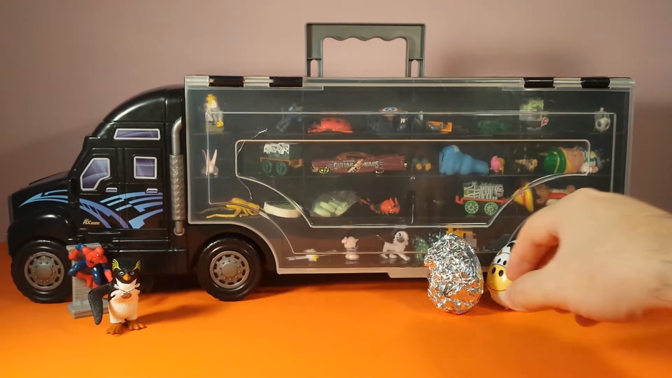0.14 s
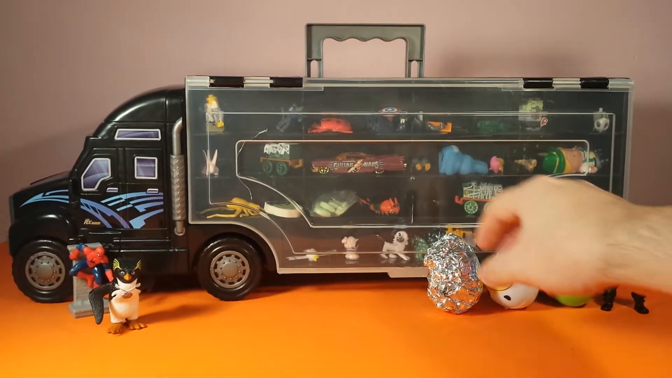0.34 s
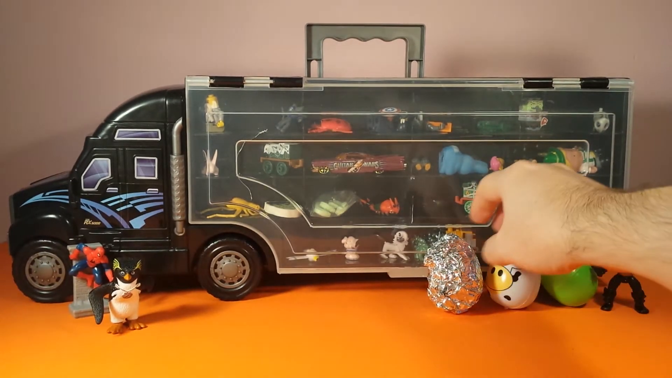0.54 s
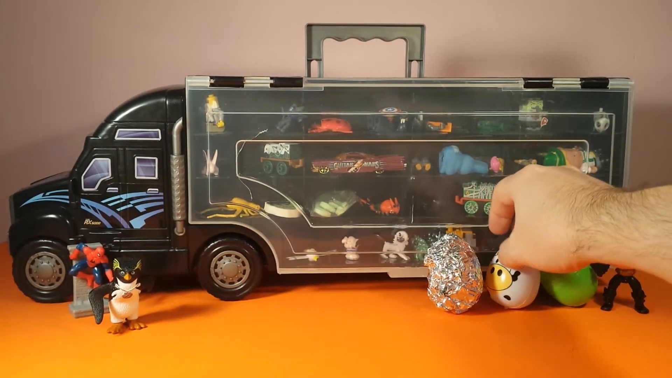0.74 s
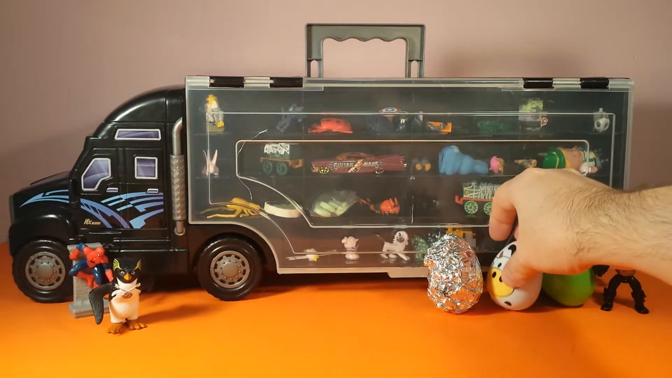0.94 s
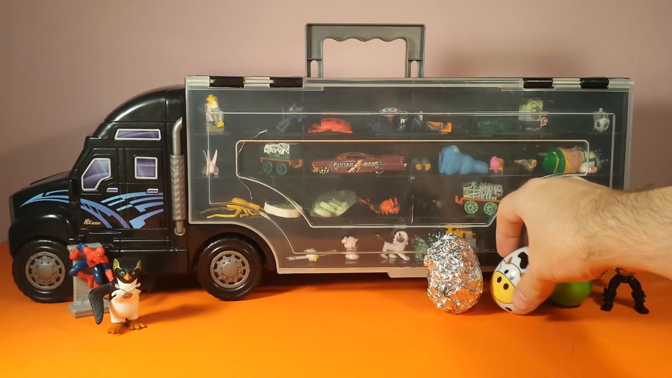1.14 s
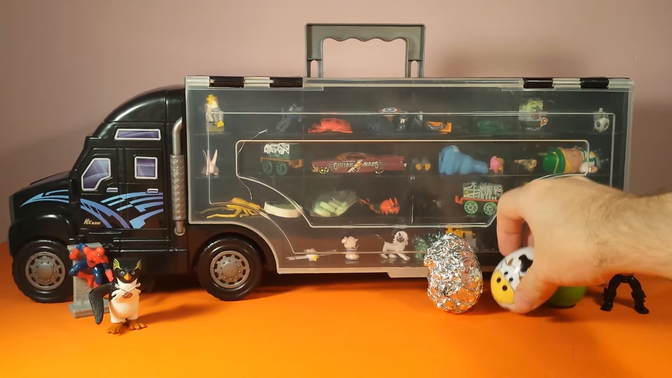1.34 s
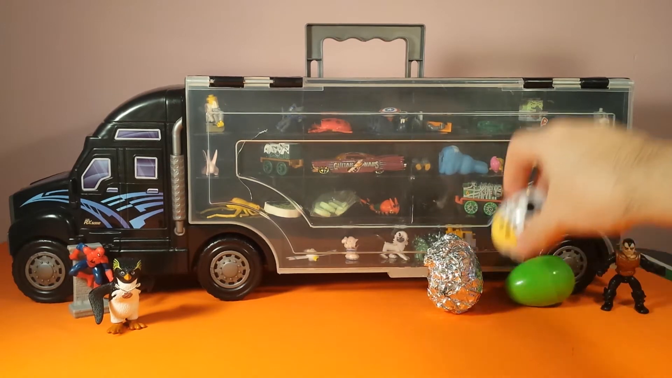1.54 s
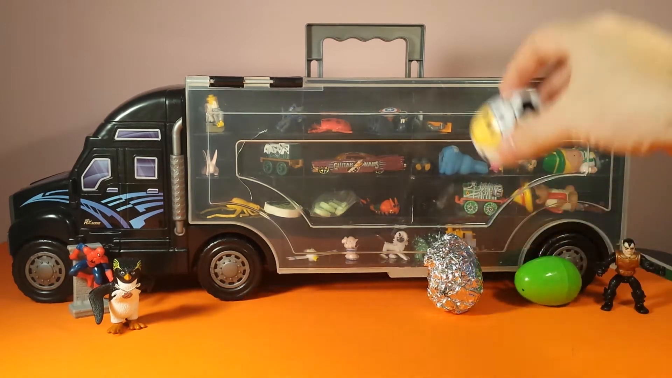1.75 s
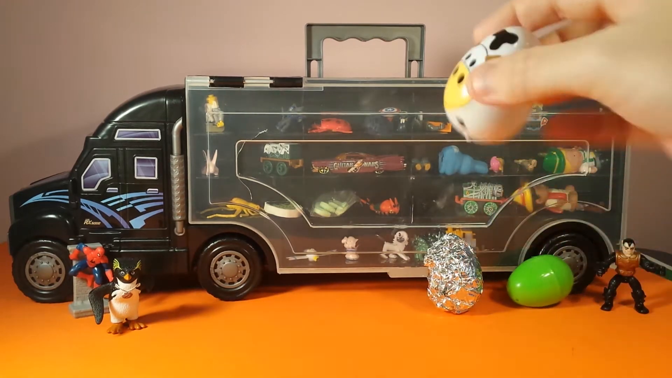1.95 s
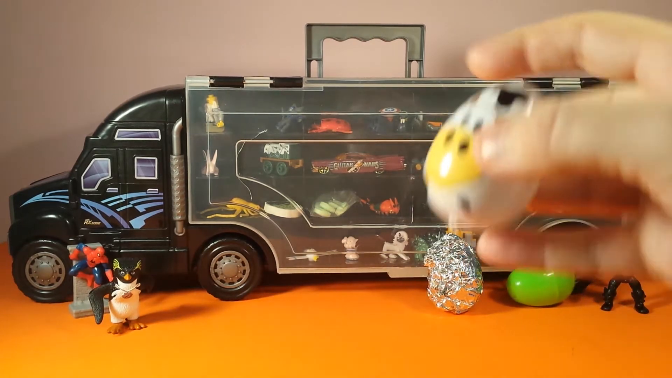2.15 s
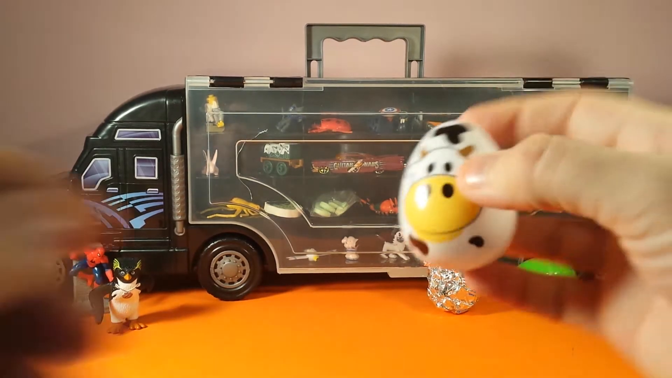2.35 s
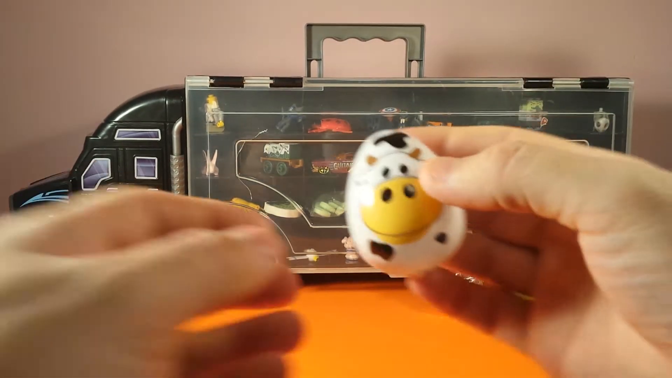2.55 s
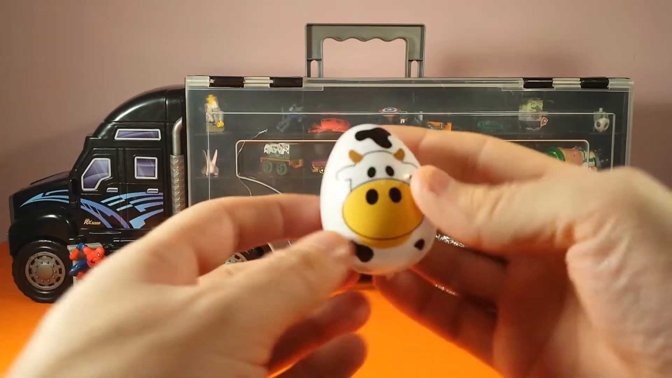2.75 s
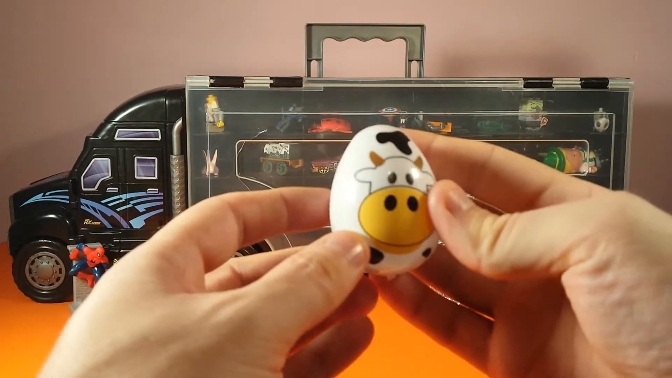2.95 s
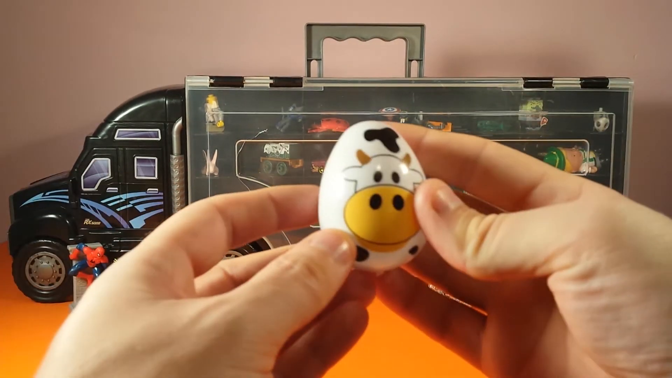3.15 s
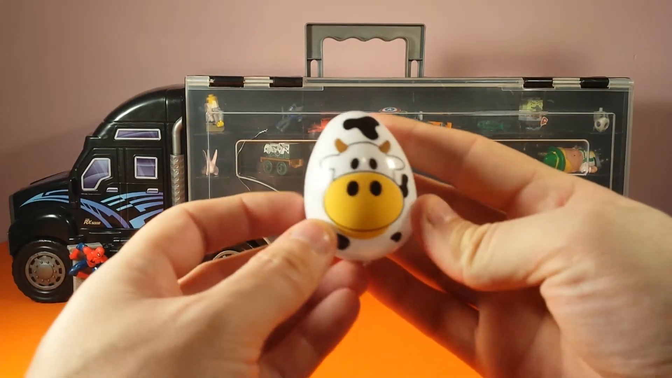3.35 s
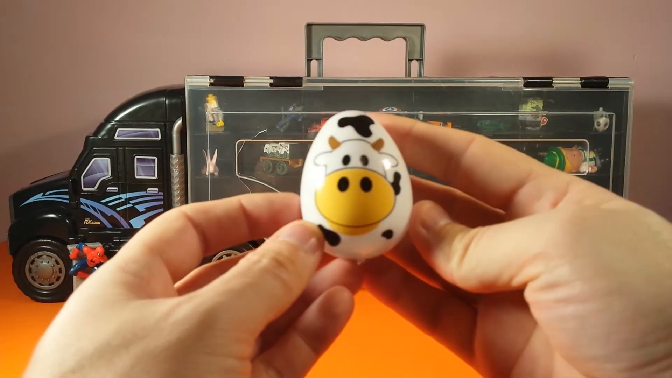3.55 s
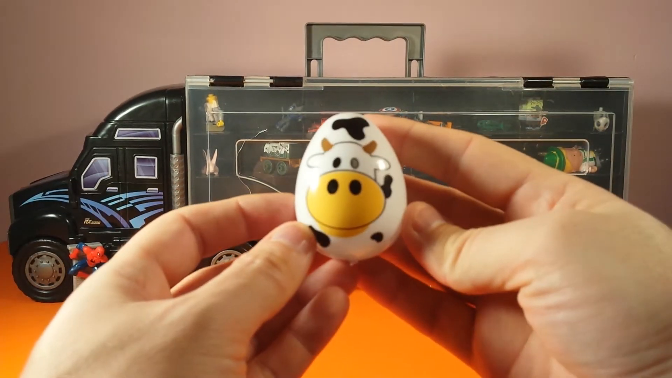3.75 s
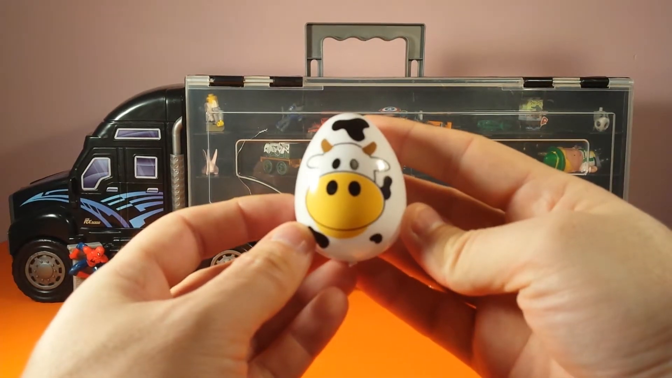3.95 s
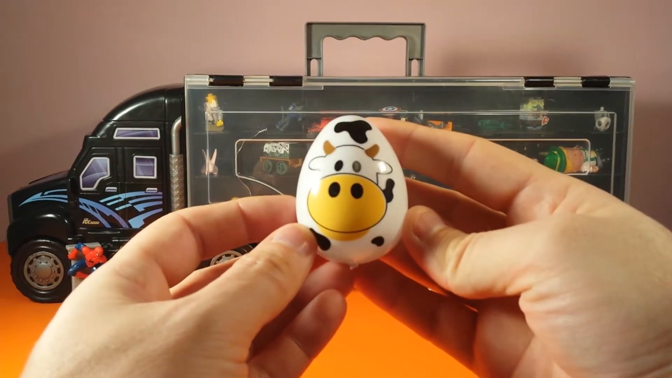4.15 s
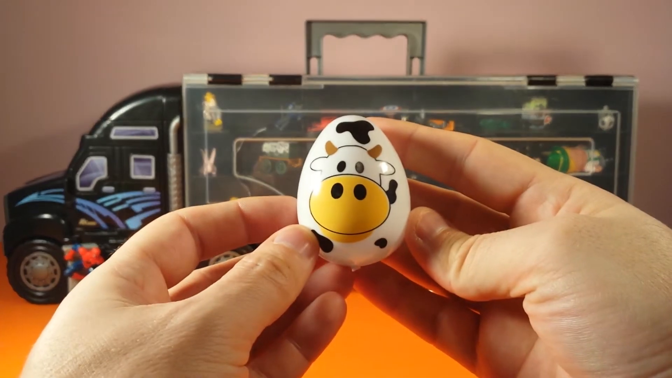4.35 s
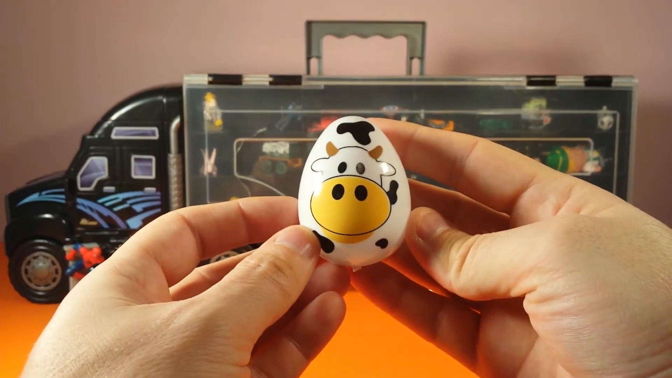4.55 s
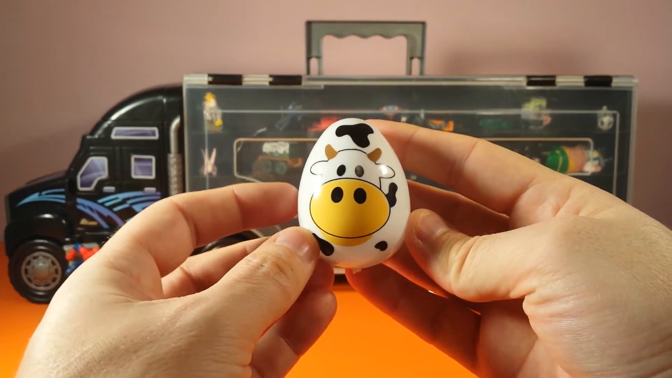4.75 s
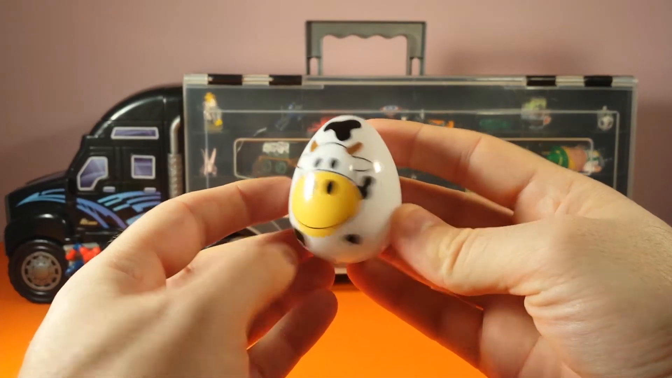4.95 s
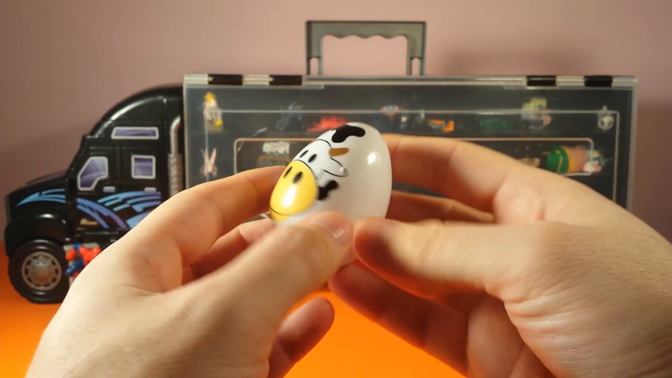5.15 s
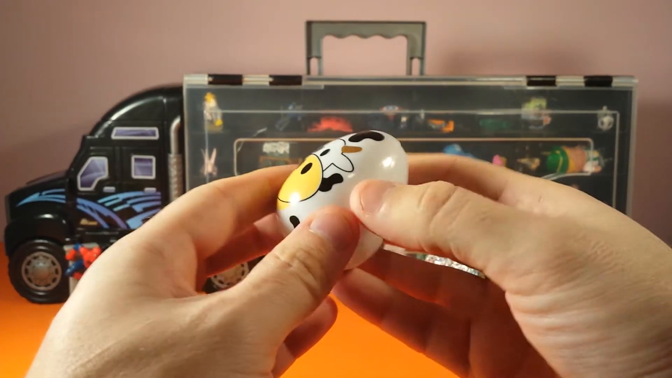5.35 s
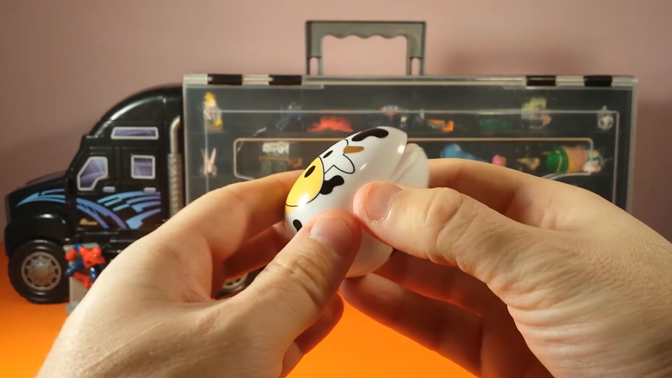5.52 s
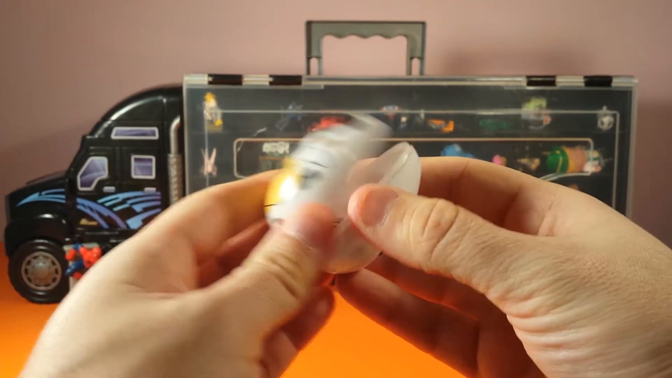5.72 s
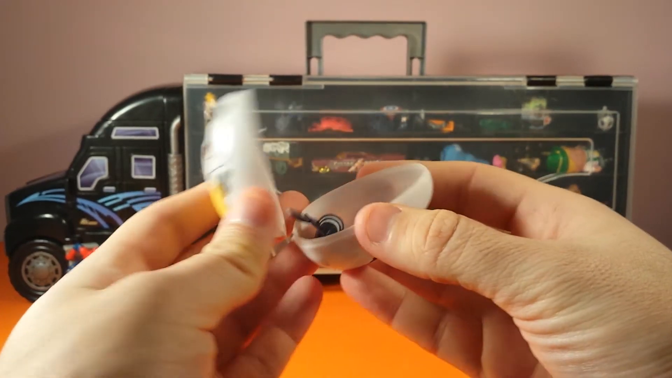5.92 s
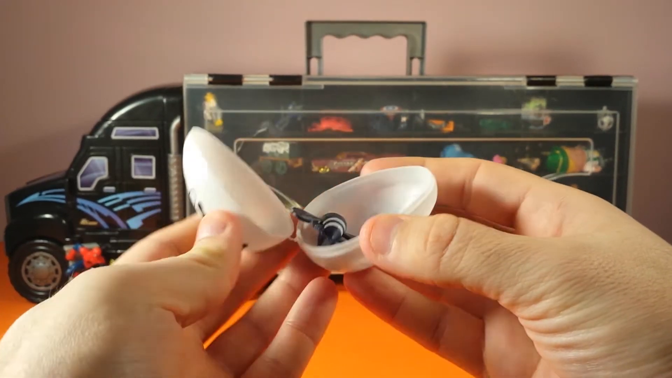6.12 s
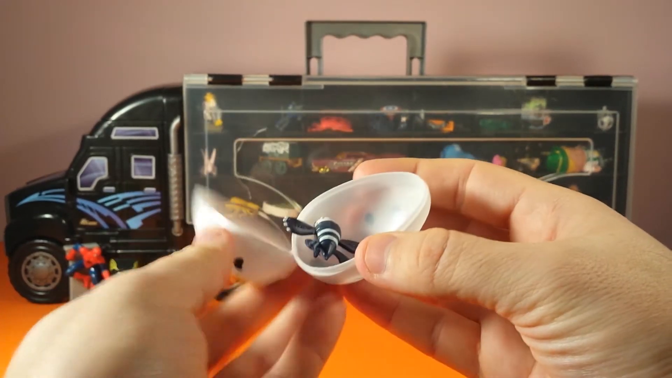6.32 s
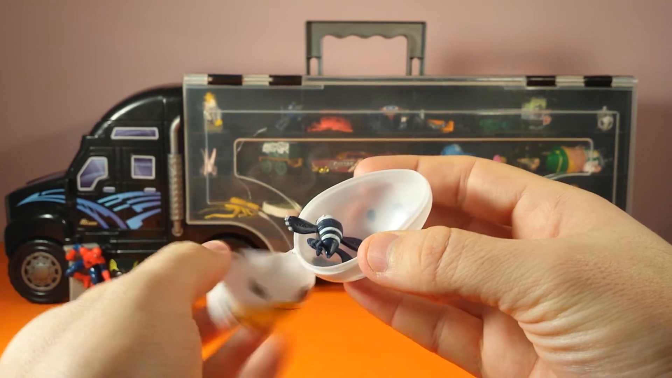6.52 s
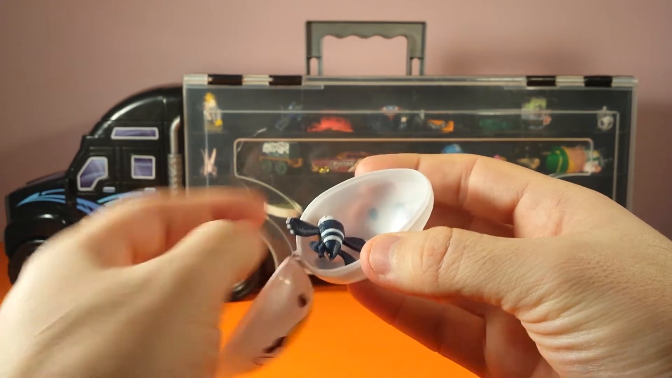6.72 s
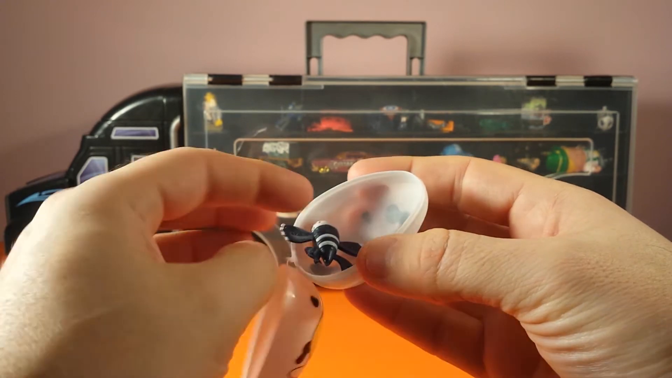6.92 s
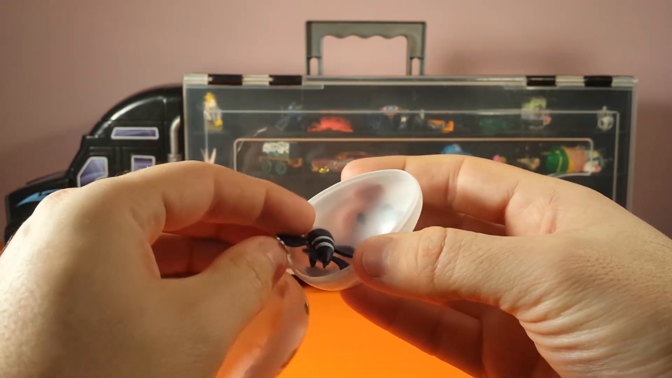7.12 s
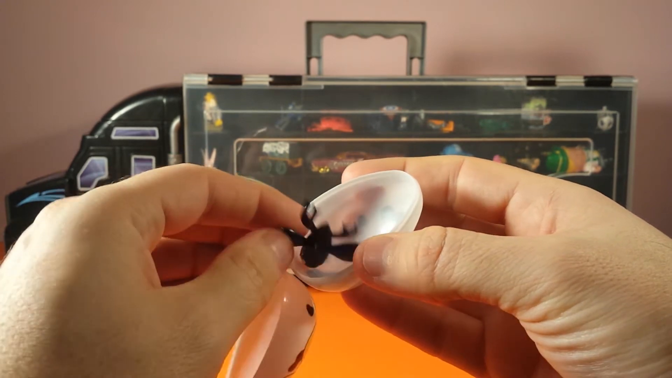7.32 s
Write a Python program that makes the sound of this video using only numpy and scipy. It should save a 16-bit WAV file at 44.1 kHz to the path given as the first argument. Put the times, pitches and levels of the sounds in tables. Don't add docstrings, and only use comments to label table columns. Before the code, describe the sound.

Crinkly foil brush, hollow plastic knocks, quiet handling, a loud double pop of a toy egg opening, then a little toy dropping in the shell.

```python
import sys
import numpy as np
from scipy import signal
from scipy.fft import rfft, irfft, next_fast_len
from scipy.io import wavfile

SR = 44100
rng = np.random.default_rng(int(sys.argv[2]) if len(sys.argv) > 2 else 0)


def voltage_ratio(decibels):
    exponent = np.asarray(decibels, float) / 20
    return 10 ** exponent


def wav_record(signal):
    frames = np.transpose(np.atleast_2d(signal))
    bounded = np.clip(frames, -1, 1)
    quanta = np.round(bounded * 32767).astype(np.int16)
    wavfile.write(sys.argv[1], SR, quanta)


N = 329868

# [t/s, peak level/dB, shell f/Hz, contact click/dB]
KNOCKS = [(.153, -37, 733, -1), (.195, -38.5, 718, -6), (.252, -42.5, 517, -11), (6.717, -68.5, 700, 5),
          (.728, -49.5, 600, -4.5), (.781, -46.5, 555, 1), (.8, -52.5, 237, -11), (.931, -57, 557, -21),
          (1.009, -65, 520, -18), (1.07, -46, 475, -14), (1.377, -37, 590, -19.5),
          (1.4005, -42.5, 547, -20.5), (1.427, -44, 560, -22), (1.447, -48, 596, -23),
          (1.47, -44.5, 625, -16), (1.492, -51, 570, -11), (1.533, -38, 580, -16), (1.556, -50, 580, -17),
          (1.796, -61, 334, -13), (3.171, -53, 248, -5.5), (1.541, -43, 600, -16), (1.567, -52, 620, -5),
          (1.514, -62, 524, -18), (5.743, -45.5, 337, -11), (5.755, -47, 314, -10), (5.842, -68, 312, -16),
          (6.6, -61.5, 930, -17), (7.27, -62, 860, 10.5), (7.3298, -63, 196, 11.5)]
# [t/s, peak level/dB, f/Hz, t60/s]
THUDS = [
    (0.253, -64, 123, 0.066),
    (0.451, -62, 116, 0.2),
    (1.428, -48.5, 74, 0.1),
    (1.523, -49, 62.5, 0.097),
    (1.598, -48, 52.3, 0.096),
    (1.627, -51, 89.5, 0.1),
    (1.667, -53, 69.6, 0.056),
    (5.779, -48.5, 51, 0.14),
    (5.765, -60, 305, .1),
    (5.792, -51, 304.6, 0.17),
]
# [f/Hz, level/dB]
CLACK = [(150, -43), (400, 3), (1000, -2), (1800, -3), (2800, -7.5), (3600, -17), (16000, -37)]
# [t/s, peak level/dB, ring f/Hz, left-right/dB, ring level/dB]
TICKS = [(.1416, -38, 7660, 0, -8), (.1456, -25, 6480, 2, -12), (0.155, -22, 6060, 1.5, -12),
         (.1564, -33, 7000, 1, -10), (.1644, -25, 6160, 5, -6), (.1925, -36, 6370, 2, -10),
         (0.234, -30, 6800, 4, -6), (0.2366, -23, 6400, -3, -8), (0.2455, -23, 6300, 6, -11),
         (0.242, -18, 6000, 5, -8), (0.2532, -17, 6100, -5, -3), (0.256, -24, 5500, 5, 4),
         (0.264, -28, 6260, 5, -7), (1.455, -53, 7300, 0, 1), (1.477, -53, 6840, 2, -1),
         (5.7868, -27, 7000, -9, 0.5), (0.7836, -40, 6320, 6, -8), (1.0717, -51, 6860, 9, -9),
         (1.3093, -50.5, 6240, 15, -10), (1.379, -51.5, 6850, 1, -4), (3.29, -40, 6360, -4, -33),
         (4.8807, -66, 2260, 3, 3), (4.972, -51, 4900, 0, -4), (5.7218, -35.5, 6900, -8, -10),
         (5.8053, -29.5, 8070, -12, 0), (5.809, -26, 7750, -12.5, -4), (5.9387, -49, 6650, 0, -14),
         (6.2696, -71, 3210, 3, -4), (6.2803, -54, 8270, -13, -3), (6.7204, -32, 5520, -3, -2),
         (7.113, -51.5, 7400, -7.5, -10)]
# [t/s, peak level/dB, ring f/Hz, ring t60/s, ring level/dB]
CATCHES = [
    (3.151, -48, 5000, .01, -6),
    (3.865, -84, 5120, .35, 13),
]
# [f/Hz, level/dB]
TICK_COLOUR = [(350, -40), (600, -18), (2500, -24), (3040, -18), (3580, -14.5), (6370, -1), (9890, -12),
               (12800, -6), (16000, -26)]
# [t/s, peak level/dB, centre f/Hz, left-right/dB, t60/s]
SCRAPES = [(0.243, -27, 4400, 9, 0.14), (.262, -32, 4170, 0, 0.22), (0.3539, -31.5, 4200, 1.5, 0.14),
           (5.55, -34.5, 6500, 0.5, 0.3), (0.4793, -44.5, 4550, 3.5, 0.25), (0.6483, -46.5, 5670, 4, 0.14),
           (.6644, -46.5, 4540, 2.5, 0.39), (1.134, -58, 6610, 9, 0.14), (1.4195, -51, 7340, -4, 0.14),
           (1.5346, -47.5, 7600, 1, 0.1), (1.5682, -54, 7640, -4, 0.13), (1.84, -54.5, 6200, 2, 0.22),
           (1.905, -62, 7600, -9, 0.14), (2.099, -55, 6500, 0, 0.54), (2.25, -60.5, 5560, 4, 0.55),
           (4.92, -57.5, 6500, 0, 0.19), (5.21, -58, 6600, 0, 0.73), (2.8007, -53.5, 6900, 0, 0.3),
           (5.031, -52, 6390, 3, 0.037), (5.125, -54.5, 7100, -2, 0.35), (5.369, -56, 6450, -2, 0.11),
           (6.0148, -59.5, 6100, -1, 0.086), (6.136, -60, 6340, -5, 0.18), (6.6018, -45.5, 7130, -5, 0.041),
           (6.6463, -49.5, 7530, -8, 0.038), (7.1294, -55.5, 6270, -2, 0.054),
           (7.213, -60, 7620, -10, 0.085), (7.276, -52.5, 7600, -9.5, 0.2),
           (7.348, -54.5, 7600, -6.5, 0.16)]
# [t/s, peak level/dB, left-right/dB, rise/s, t60/s]
DRAGS = [(0.066, -40, -5, 0.028, 0.16), (.128, -22.5, 0, 0.035, 0.059), (.185, -29, 1, 0.0099, 0.2),
         (0.22, -27.5, -5, 0.017, 0.071), (.232, -23, 0, 0.022, 0.061), (.247, -29, -2, 0.0088, 0.058),
         (.275, -36, 2, 0.0095, 0.16), (.485, -48, -4, 0.018, 0.13), (3.29, -50, -3, 0.031, 0.42),
         (3.497, -51.5, -8, 0.041, 0.1), (4.04, -58, -3, 0.034, 0.32), (4.191, -54.5, -3, 0.05, 0.35),
         (6.457, -46, 1.5, 0.011, 0.15), (5.736, -47.5, -4, 0.019, 0.98), (5.761, -32.5, 7, 0.027, 0.1),
         (5.779, -26, -7.5, 0.0065, 0.045), (5.785, -34, 1, 0.0014, 0.016)]
# [t/s, peak level/dB, t60/s]
SLIDES = [
    (5.546, -54, .16),
    (5.735, -44, 0.48),
    (5.776, -57, .1),
    (6.27, -53, 0.044),
    (6.33, -64, 0.17),
    (7.206, -57, 0.2),
    (7.268, -55.5, 0.29),
    (7.33, -69.5, 0.072),
]
# [f/Hz, level/dB]
RUSTLE = [(530, -46), (900, -15), (1160, -11.5), (1680, -13), (1970, -14), (2220, -12), (5350, -8),
          (6330, -5.5), (9310, -10), (13700, -20.5), (16000, -24)]
# [t/s, peak level/dB, brightness/dB per octave, contact click/dB]
RATTLES = [
    (2.0008, -46, 7, -7.5),
    (2.4965, -49.5, -0.5, -14),
    (2.546, -64, 0, -20),
    (2.711, -62.5, 4, 3.5),
    (2.91, -57.5, -6, -15),
    (3.074, -61, -1, -18),
    (3.234, -60.5, -2, -10),
]
# [f/Hz, level/dB, t60/s]
HELD_MODES = [(324, -6.5, 0.081), (493, 3.5, 0.038), (620, -2, 0.044), (713, -2.5, 0.046),
              (960, 1.5, 0.014), (1300, -17, .014), (1770, -20, 0.01), (2700, -23.5, .01)]
# [t/s, peak level/dB, brightness/dB per octave, contact click/dB]
DROPS = [
    (6.3271, -39, 0, -7.5),
    (6.387, -52, -3, -19),
]
# [f/Hz, level/dB, t60/s]
OPEN_MODES = [(231, 0, 0.057), (296, -3, 0.019), (494, -10.5, 0.088), (600, -10, .04), (1030, -26, 0.012),
              (1470, -7.5, 0.016), (1620, -12, 0.017), (2190, -28, .012), (2640, -21.5, 0.058)]
# [f/Hz, peak level/dB, t60/s, start phase/turns]
POP_MODES = [(256, -15, .04, .44), (730, -18, .018, .84), (1150, -23, .014, .15), (1650, -23.5, .012, .0),
             (540, -20, .018, .24), (2030, -38, .01, .9)]
# [f/Hz, level/dB, t60/s]
POP_LEFT = [(6270, -14, 0.011), (5400, -28, .007), (9050, -32.5, 0.0071), (7600, -35.5, .006),
            (3840, -34, 0.0054), (13570, -42, .004)]
# [f/Hz, level/dB, t60/s]
POP_RIGHT = [(5280, -14.5, 0.0059), (6400, -20.5, .006), (7120, -16, 0.0068), (9160, -15.5, .006),
             (10200, -19.5, 0.006), (11300, -14.5, 0.0041), (3820, -36.5, .012), (13400, -24, .003)]
# [t after the pop/s, left level/dB, right level/dB]
SLIPS = [
    (-.0018, -36, -28),
    (-.0009, -22, -7),
    (-.0003, -2, 0),
    (.0002, -8, 0),
    (.0008, -10, -1),
    (.0015, -3, -8),
    (.0028, -18, -12),
    (.0042, -13, -12),
    (.0064, -20, -17),
]
# [t/s, f/Hz]
CAVITY = [
    (5.758, 1200),
    (5.768, 1250),
    (5.778, 1324),
    (5.783, 1417),
    (5.787, 1540),
    (5.792, 1680),
    (5.801, 1880),
    (5.81, 1970),
    (5.83, 1950),
]
# [t/s, level/dB, rise/s, t60/s]
JUDDERS = [
    (5.767, -11, 0.0027, 0.036),
    (5.7745, -10.5, 0.0016, 0.033),
    (5.7785, 2.5, 0.0037, 0.013),
    (5.786, 2, 0.001, .02),
    (5.791, 0, 0.0014, 0.017),
    (5.7965, -7, 0.0018, 0.018),
    (5.8025, -9.5, .002, 0.021),
    (5.806, -15, 0.0017, 0.03),
]
# [t/s, peak level/dB]
FLICKS = [
    [(3.1508, -60), (3.1521, -47)],
    [(4.9731, -57), (4.9738, -52), (4.978, -64)],
    [(6.7191, -49), (6.7195, -41), (6.7212, -51), (6.724, -52), (6.7272, -59)],
    [(2.7155, -62), (5.378, -65), (5.9205, -62)],
]
# [f/Hz, level/dB, t60/s]
FLICK_MODES = [
    [(5660, 0, .055), (5820, -1.5, .045), (3950, -13, .03), (8000, -15, .015), (9300, -15, .05),
     (11800, -9, .012), (14000, -12, .01)],
    [(2300, -10, .008), (4880, 0, .018), (6700, -4, .014), (8500, -6, .012)],
    [(2600, -14, .004), (3500, -8, .012), (4850, -2, .007), (6200, -1, .004), (7000, -5, .004),
     (8000, -6, .007), (12800, -8, .003)],
    [(480, -3, .04), (640, 0, .04), (790, -3, .03)],
]
# [t/s, motion level/dB, grip level/dB: skin slide over rustle]
BRUSH = [
    (0, -54, -7),
    (.125, -59.5, -10),
    (0.141, -43, -15),
    (.244, -41.5, -14),
    (.33, -53.5, -7),
    (.476, -65, -0.5),
]
# [t/s, motion level/dB, grip level/dB: skin slide over rustle]
HANDS = [(.6, -73, -2), (.82, -69.5, -6.5), (1.04, -75.5, 0.5), (1.39, -70, 0), (1.54, -61.5, -4.5),
         (1.76, -68, -8), (2.2, -70.5, -4), (2.9, -73, -4), (3.35, -68, -1), (3.7, -69, 2),
         (4.45, -78, -4.5), (5.16, -72.5, -5.5), (5.52, -72, -11), (5.761, -64, 6.5), (6.05, -78.5, -4.5),
         (6.47, -67.5, -5), (7.0, -73.5, -5.5), (7.4, -76.5, -3)]
# [f/Hz, level/dB]
SKIN = [(59, -33.5), (100, -1.5), (409, -2), (446, -1), (521, -5), (618, -6.5), (733, -7.5), (1190, -13.5),
        (3000, -20.5), (3900, -36), (6600, -120)]
# [f/Hz, level/dB]
RUMBLE = [(15, -17.5), (30, -3), (70, -1.5), (130, -7), (220, -12.5), (400, -49.5)]
# [f/Hz, left-right/dB]
LEAN = [(60, -5), (180, 1), (550, 8), (1650, -1.5), (4970, 3.5), (15000, -13)]
# [f/Hz, t60/s]
ROOM_T60 = [(100, 0.55), (300, 0.37), (1000, 0.23), (4000, 0.18), (9000, 0.28), (16000, 0.11)]
# [f/Hz, level/dB]
WET = [(100, -17.5), (400, -17), (1000, -10.5), (1500, -14.5), (3000, -14.5), (6500, -13.5), (10000, -16.5),
       (16000, -20.5)]
# [delay t/s, left level/dB, right level/dB]
ECHOES = [
    (.011, -26, -27),
    (.0195, -17.5, -22.5),
    (.0245, -19, -20),
    (.031, -25.5, -21),
    (.041, -15.5, -21.5),
    (.052, -22.5, -32),
]
# [f/Hz, level/dB]
AIR = [(12, -47.5), (20, -10.5), (58, -25.5), (123, -5.5), (146, -17.5), (262, -11.5), (347, -28),
       (1120, -29.5), (1910, -31), (2670, -30.5), (3600, -28.5), (8890, -37.5), (14700, -29), (16000, -38)]
# [f/Hz, left-right correlation/1]
SAME = [(60, 0.91), (130, 0.94), (290, 0.62), (640, -0.5), (1410, -0.21), (3100, -0.85), (6820, -0.19),
        (15000, 0.077)]
# [t/s, level/dB]
FAR = [(0, 8), (1, -2), (2, -0.5), (3, 1.5), (3.7, 0.5), (4.2, 2), (4.4, -8), (5, -5.5), (5.5, -1.5),
       (6.3, 0.5), (7.48, -2)]

SHELL_HZ = 540
SCRAPE_RISE_S = 0.0034


def evened(x):
    return x / np.sqrt(np.mean(x ** 2) + 1e-20)


def read(points, hz):
    f, value = np.transpose(points)
    return np.interp(np.log(hz + 1), np.log(f + 1), value)


def add(mix, s, sound):
    part = mix[:, max(round(s * SR), 0):][:, :sound.shape[1]]
    part += sound[:, :part.shape[1]]


def colour(x, points):
    size = next_fast_len(x.shape[-1])
    gain = voltage_ratio(read(points, np.fft.rfftfreq(size, 1 / SR)))
    return irfft(rfft(x, size) * gain, size)[..., :x.shape[-1]]


def resonate(x, hz, width):
    turn = np.exp(2j * np.pi * np.cumsum(hz * np.ones(x.shape[-1])) / SR)
    r = np.exp(-np.pi * width / SR)
    return 2 * (turn * signal.lfilter([1 - r], [1, -r], x / turn)).real


def pair(size, same):
    a, b = rng.standard_normal((size, 2)).T
    same = np.clip(same, 0, 1)
    return np.array([a, same * a + np.sqrt(1 - same ** 2) * b])


def crackle(size, per_s, spread_db, grain_s, same):
    sizes = voltage_ratio(spread_db * np.minimum(rng.exponential(1, size), 5))
    hits = sizes * (rng.random(size) < per_s / SR)
    puffs = signal.lfilter([1], [1, -np.exp(-1 / (grain_s * SR))], hits ** 2)
    return evened(np.sqrt(puffs) * pair(size, same))


def panned(db):
    return voltage_ratio(np.array([[db / 2], [-db / 2]]))


def fade(t, t60):
    return voltage_ratio(-60 * t / t60)


def ring(t, hz, t60, turn=0):
    return fade(t, t60) * np.sin(2 * np.pi * (hz * t + turn))


def knocks():
    out, t = np.zeros((2, N)), np.arange(8000) / SR
    for s, db, hz, clack_db in KNOCKS:
        t60 = 0.056 * (SHELL_HZ / hz) ** 0.32 * voltage_ratio(-0.12 * (db + 50.5))
        shell = 0.69 * ring(t, hz, t60) + 0.35 * ring(t, 0.791 * hz, 0.9 * t60)
        shell += 0.081 * ring(t, 1.3 * hz, 0.5 * t60) + 0.17 * ring(t, 0.416 * hz, 1.1 * t60)

        over_db = -8.5 if 1.39 < s < 1.6 else -18
        side = 1 + .08 * np.sin(900 * s)
        over = ring(t, 2.09 * side * hz, 0.46 * t60)
        over += 0.78 * ring(t, 1.75 / side * hz, .35 * t60)
        over += .5 * ring(t, 2.75 * side * hz, 0.17 * t60)
        shell += voltage_ratio(over_db) * over

        shell *= np.minimum(t / (0.00017 * voltage_ratio(-clack_db)), 1)
        clack = evened(colour(pair(len(t), 0.17), CLACK)) * (fade(t, 0.0028) + 0.22 * fade(t, 0.19))
        add(out, s + 0.001676, voltage_ratio(db) * panned(2.4) * (shell + voltage_ratio(clack_db) * clack))
    out = signal.lfilter(*signal.butter(2, 140, "high", fs=SR), out)
    for s, db, hz, t60 in THUDS:
        add(out, s, voltage_ratio(db) * panned(-9.5) * ring(t, hz, t60))
    return out


def ticks():
    foil_until_s, foil_rise_s, foil_db = .3, .0013, -7
    out, t = np.zeros((2, N)), np.arange(4000) / SR
    rows = [(*row, 0.0093) for row in TICKS]
    rows += [(s, db, hz, 0, ring_db, t60) for s, db, hz, t60, ring_db in CATCHES]
    for s, db, hz, pan_db, ring_db, t60 in rows:
        wide = colour(pair(len(t), 0.074), TICK_COLOUR)
        wall = ring(t, hz, t60) + .6 * ring(t, .95 * hz, .4 * t60) + .6 * ring(t, 1.04 * hz, .4 * t60)
        wall *= np.minimum(t / 0.00051, 1)
        if s < foil_until_s:
            swell = np.minimum(t / foil_rise_s, 1) * fade(np.maximum(t - foil_rise_s, 0), .017)
            crack = voltage_ratio(foil_db) * swell * evened(wide / 2 + 6.0 * resonate(wide, hz, 0.48 * hz))
            wall *= voltage_ratio(foil_db - 5)
            s -= foil_rise_s / 2
        else:
            crack = evened(wide + 4.6 * resonate(wide, hz, .5 * hz)) * fade(t, 0.0033)
            crack += 0.088 * evened(wide) * fade(t, 0.081)
        add(out, s - .0004, voltage_ratio(db + 3) * panned(pan_db) * (0.64 * crack + voltage_ratio(ring_db) * wall))
    return out


def scrapes():
    drag_hz, toy_hz = 6800, 1460
    out, t = np.zeros((2, N)), np.arange(9000) / SR
    rows = [(*row, SCRAPE_RISE_S) for row in SCRAPES]
    rows += [(s, db, drag_hz, pan_db, t60, rise) for s, db, pan_db, rise, t60 in DRAGS]
    rows += [(s, db, toy_hz, 0, t60, 2 * SCRAPE_RISE_S) for s, db, t60 in SLIDES]
    for s, db, hz, pan_db, t60, rise in rows:
        grains = crackle(len(t), per_s=3000, spread_db=2.6, grain_s=.0008, same=.15)
        grit = evened(colour(grains, RUSTLE))
        grit = evened(grit + 3.5 * resonate(grit, hz, 2300))
        swell = np.minimum(t / rise, 1) ** 2 * fade(np.maximum(t - rise, 0), t60)
        add(out, s - .002, voltage_ratio(db - 9.0) * panned(pan_db) * swell * grit)
    return out


def rattles():
    out, t = np.zeros((2, N)), np.arange(8000) / SR
    hits = [(row, HELD_MODES) for row in RATTLES] + [(row, OPEN_MODES) for row in DROPS]
    for (s, db, tilt_db, clack_db), modes in hits:
        shell = 0
        for hz, mode_db, t60 in modes:
            swell = np.minimum(t * hz, 1)
            gain = voltage_ratio(mode_db + tilt_db * np.log2(hz / SHELL_HZ))
            shell = shell + gain * swell * ring(t, hz * rng.uniform(0.938, 1.03), t60)
        clack = evened(colour(pair(len(t), 0.37), CLACK))
        clack *= np.minimum(t / 0.00072, 1) * (fade(t, 0.0077) + 0.17 * fade(t, 0.25))
        add(out, s, voltage_ratio(db) * panned(1.5) * (shell + voltage_ratio(clack_db) * clack))
    return out


def pop():
    pop_s = 5.5393
    out, t = np.zeros((2, N)), np.arange(6000) / SR
    thump = sum(voltage_ratio(db) * ring(t, hz, t60, turn) for hz, db, t60, turn in POP_MODES)
    thump *= np.sin(np.pi / 2 * np.minimum(t / 0.00026, 1)) ** 2
    thump *= fade(np.maximum(t - .0058, 0), 0.0086)
    add(out, pop_s, panned(.4) * signal.lfilter(*signal.butter(1, 100, "high", fs=SR), thump))
    for s, *slip_db in SLIPS:
        walls = np.array([sum(voltage_ratio(db) * ring(t, hz * rng.uniform(0.99, 1.04), 0.58 * t60, hz * s)
                              for hz, db, t60 in modes) for modes in (POP_LEFT, POP_RIGHT)])
        grit = evened(colour(pair(len(t), 0.27), RUSTLE))
        grit = voltage_ratio(-26) * panned(-4.0) * grit * fade(t, 0.016)
        add(out, pop_s + s, voltage_ratio(np.array(slip_db)[:, None]) * np.minimum(t / 0.00039, 1) * (walls + grit))
    return out


def cavity():
    s, hz = np.transpose(CAVITY)
    t = np.arange(s[0], s[-1], 1 / SR)
    hz = np.interp(t, s, hz)
    grains = crackle(len(t), per_s=1200, spread_db=4.0, grain_s=0.0016, same=0.34)
    grit = evened(resonate(resonate(grains, hz, 570), hz, 570))
    turns = np.cumsum(hz) / SR + np.array([[0], [.12]])
    edges = signal.windows.tukey(len(t), .1)
    out = np.zeros((2, N))
    for k, (start, db, rise, t60) in enumerate(JUDDERS):
        jerk = np.clip((t - start) / rise, 0, 1) * voltage_ratio(db) * fade(np.maximum(t - start - rise, 0), t60)
        whistle = np.sin(2 * np.pi * (turns + 0.373 * k)) + 0.076 * np.sin(2 * np.pi * 1.1 * turns)
        add(out, s[0], voltage_ratio(-31) * jerk * (whistle + 0.5 * grit) * edges)
    return out


def flicks():
    out, t = np.zeros((2, N)), np.arange(2000) / SR
    for hits, modes in zip(FLICKS, FLICK_MODES):
        wall = sum(voltage_ratio(db) * ring(t, hz, t60, np.array([[0], [hz * .00002]])) for hz, db, t60 in modes)
        for s, db in hits:
            add(out, s, voltage_ratio(db) * np.minimum(t / .0002, 1) * wall)
    return out


def hands():
    s, motion_db, grip_db = np.transpose(BRUSH + HANDS)
    t = np.arange(N) / SR
    motion_db, grip_db = np.interp(t, s, motion_db), np.interp(t, s, grip_db)
    wander = evened(sum(np.sin(2 * np.pi * (f * t + rng.random())) / np.sqrt(f)
                        for f in np.geomspace(.5, 5, 12)))

    grains = crackle(N, per_s=630, spread_db=-1.5, grain_s=0.0068, same=0.026)
    lean = np.array([colour(x, [(f, sign * db / 2) for f, db in LEAN]) for sign, x in zip((1, -1), grains)])
    rustle = colour(lean, RUSTLE)
    cupped = resonate(rustle, 6900 + 800 * wander, 1100)
    out = voltage_ratio(0.5 + motion_db) * evened(rustle + .45 * cupped)

    skin = crackle(N, per_s=410, spread_db=3.0, grain_s=0.014, same=0.58)
    out += voltage_ratio(motion_db + grip_db) * evened(colour(skin, SKIN))

    arm_db = -67.5 + 0.38 * (motion_db + 73) + 1.5 * wander
    return out + voltage_ratio(arm_db - 6.0) * evened(colour(pair(N, 0.45), RUMBLE))


def room(x):
    taps = np.zeros((2, SR))
    at = np.arange(0, SR - 20, 20) + rng.integers(0, 20, (2, SR // 20 - 1))
    np.put_along_axis(taps, at, rng.choice([-1., 1.], at.shape), 1)
    taps[1] += signal.lfilter(*signal.butter(2, 600, fs=SR), taps[0] - taps[1])
    hz, t, z = signal.stft(taps, SR, nperseg=256)
    tail = signal.istft(z * fade(t, read(ROOM_T60, hz)[:, None]), SR, nperseg=256)[1][:, :SR]
    tail *= np.clip((np.arange(SR) / SR - .006) / 0.0099, 0, 1)
    tail /= np.linalg.norm(tail, axis=1)[:, None]
    soft = signal.windows.hann(24) / 12
    for k, (s, *ports_db) in enumerate(ECHOES):
        add(tail, s, (-1) ** k * voltage_ratio(np.array(ports_db)[:, None] + 10.0) * soft)
    return signal.fftconvolve((x + x[::-1]) / 2, colour(tail, WET), axes=1)[:, :N]


def air():
    z = rfft(rng.standard_normal((N, 2)).T)
    hz = np.fft.rfftfreq(N, 1 / SR)
    same = np.clip(read(SAME, hz), -1, 1)
    z = np.array([z[0], same * z[0] + np.sqrt(1 - same ** 2) * z[1]]) * voltage_ratio(read(AIR, hz))
    hiss = evened(irfft(z, N))
    hum = evened(resonate(resonate(pair(N, 1.0), 121, 6.4), 121, 6.4))
    far = signal.lfilter(*signal.butter(2, 700, fs=SR), hiss + voltage_ratio(-9.0) * hum)
    drift = voltage_ratio(np.interp(np.arange(N) / SR, *np.transpose(FAR)))
    return voltage_ratio(-72) * (hiss + voltage_ratio(-4.0) * hum + (drift - 1) * far)


def scene():
    near = knocks() + ticks() + scrapes() + rattles() + cavity()
    burst, thin = pop(), flicks()
    high = signal.butter(2, 4000, "high", fs=SR)
    beamed = signal.lfilter(*high, burst[:, ::-1])[:, ::-1]
    beamed = signal.lfilter(*high, beamed)
    echoes = room(near + burst + thin / 2 - .45 * beamed)
    return near + burst + thin + echoes + hands() + air()


def roll_off(x):
    return signal.sosfilt(signal.butter(12, 16530, fs=SR, output="sos"), x)


def record(dry):
    mix = signal.sosfilt(signal.ellip(8, .5, 30, 15700, fs=SR, output="sos"), dry)
    return roll_off(mix)


dry = scene()
out = record(dry)
wav_record(out)
```